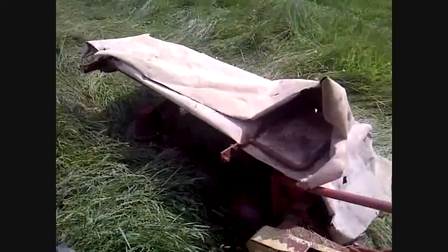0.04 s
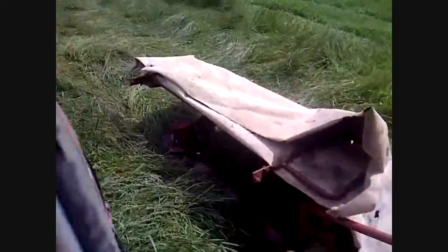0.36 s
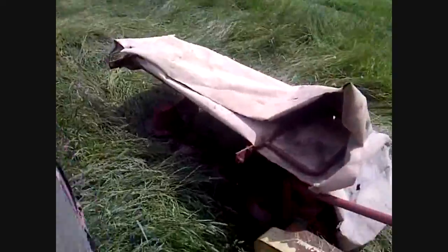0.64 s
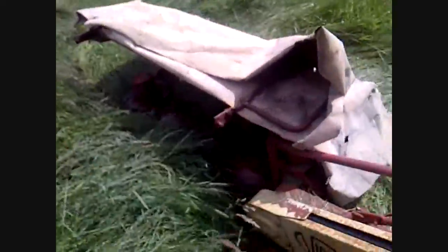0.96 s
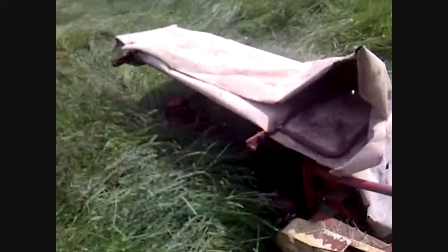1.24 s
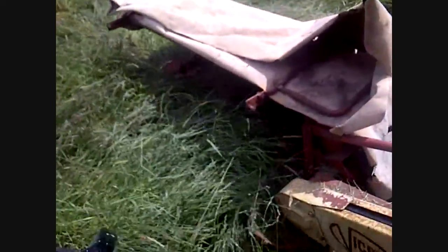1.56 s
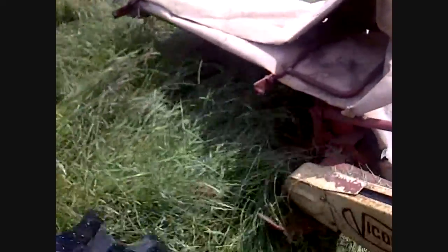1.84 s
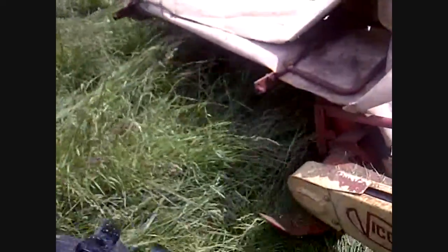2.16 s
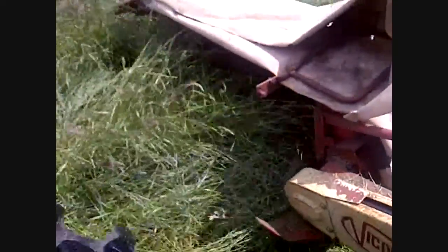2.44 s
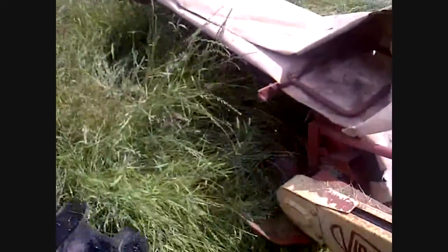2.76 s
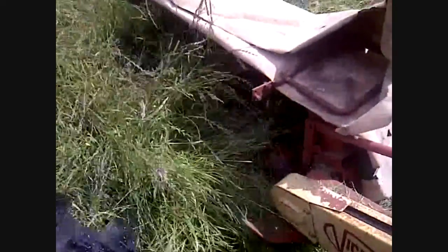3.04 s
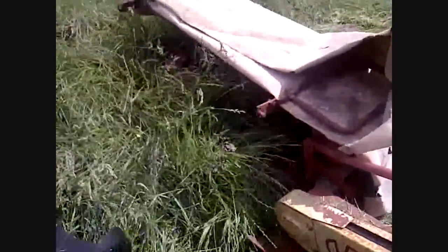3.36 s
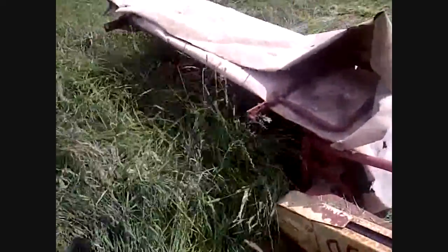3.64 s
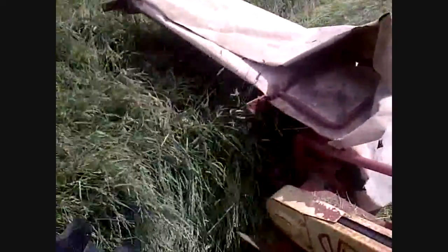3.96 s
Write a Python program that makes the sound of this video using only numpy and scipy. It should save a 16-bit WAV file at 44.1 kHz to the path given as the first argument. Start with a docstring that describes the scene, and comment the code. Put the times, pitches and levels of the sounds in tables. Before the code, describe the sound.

A disc mower roars and clatters close by for all four seconds, with hissing grass and a faint diesel hum underneath. Its gears knock most in the first 1.5 seconds; their whine swells and fades, sagging in pitch until about 2.4 seconds, then partly recovering. Blades ping near 0.4, 1.7, 2.2 and 3.9 seconds. Light wind puffs touch the microphone around 1.6 and 2.2 seconds.

```python
"""A close, clattering roar with a gear whine in it: a tractor-driven disc mower in tall grass.
Dense impacts in the cutter bar roar and ring the steel housing; the gears knock, growl and sag
under load. Stalks hiss as they snap and set the blades ringing, with a few hard pings.
The diesel hums underneath, and two puffs of wind and a faint third touch the microphone."""
import sys
import numpy as np
from scipy import signal
from scipy.fft import rfft, irfft
from scipy.io import wavfile

SR = 44100
rng = np.random.default_rng(int(sys.argv[2]) if len(sys.argv) > 2 else 0)


def store_wav(level_fs):
    """Save 16-bit WAV to argv[1]."""
    pcm = np.round(np.clip(np.atleast_2d(level_fs), -1, 1) * 32767)
    wavfile.write(sys.argv[1], SR, pcm.T.astype(np.int16))


N = 176400
T = np.arange(N) / SR

# cutter bar roar: freq_hz, density_db
ROAR_SPECTRUM = [(20, -34), (50, -35.5), (82, -23.5), (130, -21.5), (200, -18.5), (300, -10.5), (450, -3.5),
                 (530, -2.5), (595, 3), (665, -2), (785, 1.5), (840, 4.5), (940, -0.5), (1030, 1.5),
                 (1400, 2), (1650, -1.5), (2050, -14.5), (3000, -18.5), (5000, -39)]
# roar: time_s, level_db
ROAR_DB = [(0, -19.5), (.6, -19.5), (1.1, -18), (1.6, -16.5), (2.1, -15.5), (2.7, -15.5), (3.2, -17),
           (3.7, -17.5), (4, -16)]
# steel housing resonances: freq_hz, width_hz, gain_db
HOUSING_MODES = [(1009, 53, -3), (1062, 22, -2.5), (1174, 41, -1), (1246, 53, -3), (1420, 80, -2),
                 (1585, 42, -3), (1752, 60, -1.5), (1863, 66, -3)]
# housing ring: time_s, level_db
HOUSING_DB = [(0, -25.5), (.6, -24), (1, -24), (1.3, -21.5), (1.7, -23.5), (2.3, -23), (2.8, -21.5),
              (3.4, -21.5), (4, -22.5)]

# drive train speed, as the gear mesh tone: time_s, pitch_hz
MESH_HZ = [(0, 1262), (.4, 1256), (.8, 1256), (1.1, 1238), (1.5, 1218), (1.8, 1202), (2.1, 1186),
           (2.4, 1184), (2.6, 1195), (2.95, 1202), (3.2, 1218), (3.4, 1228), (3.7, 1212), (3.85, 1210),
           (4, 1222)]
# gear whine: time_s, level_db
WHINE_DB = [(0, -21.5), (.35, -23), (.6, -28), (.85, -23.5), (1.25, -19), (1.6, -25), (1.85, -19.5),
            (2.15, -28), (2.38, -17), (2.7, -27.5), (3.1, -17.5), (3.45, -17), (3.78, -29), (4, -12.5)]
# growl of worn teeth: time_s, level_db
GROWL_DB = [(0, -22), (.6, -24.5), (.85, -22), (1.3, -19), (1.7, -24), (2.3, -22), (2.8, -21.5), (3.4, -23),
            (4, -21)]
# gear knock, hardest when taking up load: time_s, level_db
KNOCK_DB = [(0, -18.5), (.5, -29.5), (.8, -21.5), (1, -19.5), (1.35, -19.5), (1.7, -29), (2.3, -29),
            (2.8, -31.5), (3.4, -28), (3.7, -31), (4, -24)]

# stalks cut and thrown against the cover: freq_hz, density_db
HISS_SPECTRUM = [(1200, -12.5), (2000, 6), (2450, 3.5), (2850, 2), (3350, 3), (3800, -1.5), (4200, -3),
                 (4480, 3), (4750, -2.5), (5100, -1), (5900, -5), (6600, -6), (7300, -10), (7900, -20)]
# stalk hiss: time_s, level_db
HISS_DB = [(0, -21.5), (.6, -20.5), (.95, -17.5), (1.5, -24.5), (2.05, -23), (2.4, -21.5), (2.75, -21.5),
           (3.3, -21.5), (3.65, -21), (3.85, -18), (4, -21)]
# top of the hiss: time_s, gain_db
HISS_TREBLE_DB = [(0, -1.5), (0.651, -7), (1, -4), (1.4, 4), (2.401, 2.5), (3.299, -2), (4, 0)]
# blade and disc resonances: freq_hz, width_hz, gain_db
BLADE_MODES = [(2490, 69, 2.5), (3293, 170, 2.5), (4010, 40, -1.5), (4130, 17, 3.5), (4440, 84, -4.5),
               (4720, 40, -10), (4930, 170, -4), (6550, 170, -13)]
# blade ring: time_s, level_db
BLADE_DB = [(0, -29.5), (.9, -32.5), (1.6, -31.5), (2.3, -27), (2.8, -27), (3.3, -37), (4, -32)]

# surges of clatter: centre_s, rattle_gain_db, clang_gain_db
SURGES = [(0.083, -28, -13), (0.148, -28, -15), (0.222, -22.5, -12), (0.313, -19, -16), (0.387, -24, -10.5),
          (0.47, -18, -9), (0.531, -18, -10.5), (0.691, -28, -10), (0.764, -17.5, -12), (0.82, -25, -9.5),
          (0.931, -19, -15), (0.973, -21, -21), (1.018, -18.5, -9.5), (1.073, -20, -9.5),
          (1.124, -35, -6.5), (1.211, -25.5, -9.5), (1.278, -25, -16), (1.359, -23, -10.5),
          (1.43, -25, -14), (1.496, -24.5, -11), (1.579, -27, -9.5), (1.658, -24.5, -8.5),
          (1.717, -20.5, -23), (1.794, -22.5, -10), (1.847, -28, -17), (1.908, -22, -11.5),
          (1.99, -19, -23), (2.049, -26, -10), (2.108, -24, -11), (2.163, -22, -13.5), (2.274, -19.5, -15),
          (2.336, -26, -8), (2.684, -23.5, -25), (2.725, -21.5, -10), (2.888, -24, -15.5), (3.023, -28, -9),
          (3.127, -20.5, -23), (3.191, -19.5, -13), (3.25, -33, -18), (3.32, -19.5, -18), (3.417, -20, -10),
          (3.472, -22, -11), (3.531, -21.5, -10.5), (3.693, -26, -12), (3.836, -24, -9), (3.898, -26, -14),
          (3.945, -31, -22)]
# metal rattle: freq_hz, density_db
RATTLE_SPECTRUM = [(1200, -9), (2000, 2.5), (2450, 4.5), (2900, 1.5), (3300, -0.5), (3900, -6), (4500, -4),
                   (5100, -1.5), (5900, -1), (6600, 1.5), (7300, -10), (7900, -20.5)]
# top of the rattle: time_s, gain_db
RATTLE_TREBLE_DB = [(0, 0), (.6, -6), (1, 0.5), (1.4, 10), (1.9, -2), (2.701, 4), (3.3, -11), (4, 3)]
# hard objects hitting a blade: start_s, pitch_hz, level_db
BLADE_HITS = [(0.382, 4759, -12.5), (1.676, 4020, -18), (2.229, 4770, -22), (3.893, 2600, -12),
              (3.897, 2730, -17)]

# diesel thump harmonics: crank_order, level_db
THUMP_ORDERS = [(1, -67), (2, -52.5), (3, -53), (4, -53), (5, -53)]
# exhaust boom at the fourth crank order: time_s, level_db
BOOM_DB = [(0, -60), (.45, -45), (.8, -48), (1.2, -64), (4, -71)]
# steady drive tones: crank_order, level_db
DRIVE_ORDERS = [(7.1, -53.5), (9.27, -43), (11.4, -42.5), (13.9, -42.5), (19.8, -40.5)]
# hum of the spinning discs: time_s, level_db
DISC_DB = [(0, -40), (1.5, -45), (2.4, -32.5), (2.8, -30), (3.5, -26.5), (4, -28)]

# wind on the microphone: centre_s, sigma_s, level_db
WIND_PUFFS = [(1.645, 0.029, -24), (2.228, .024, -27.5), (2.39, 0.021, -36)]
# wind rumble: freq_hz, density_db
WIND_SPECTRUM = [(20, -22), (70, -17), (115, -3), (220, 1), (320, -2), (600, -8.5), (2000, -74)]

TEETH, MESH_PER_CRANK_TURN, DISC_ORDER = 34, 39.55, 22.83


def cutter_bar(shaft_rad):
    """Dense impacts of discs and gears throb with the shaft, roar and ring the housing."""
    shaft_beat = np.cos(shaft_rad)
    blade_beat = np.cos(3 * shaft_rad)
    throb = 1 + .11 * shaft_beat + .13 * blade_beat + .08 * wander(rate_hz=20)
    roar = colour(throb * ticks(per_s=7000, spread_db=1.5), ROAR_SPECTRUM)
    housing = ring(ticks(per_s=3000, spread_db=.5), HOUSING_MODES)
    housing = unit(housing * (1 + .083 * shaft_beat + .13 * blade_beat))
    return envelope(ROAR_DB) * roar + envelope(HOUSING_DB) * housing


def gear_whine(mesh_rad, wobble_rad=.42, third_db=-27.5):
    """Mesh tone, shaken by backlash, swelling once per shaft turn."""
    shake = 1 + .3 * wander(rate_hz=67) + .11 * np.cos(mesh_rad / TEETH)
    phase_rad = mesh_rad + wobble_rad * wander(rate_hz=30)
    tone = np.sin(phase_rad) + amp(third_db) * np.sin(3 * phase_rad)
    return envelope(WHINE_DB) * unit(shake * tone)


def gear_growl(mesh_rad, mesh_ratio=1.03, spread_hz=114):
    """Worn, uneven teeth spread a noise band just above the mesh tone."""
    centre_rad = mesh_ratio * mesh_rad
    band = wander(spread_hz) * np.cos(centre_rad) + wander(spread_hz) * np.sin(centre_rad)
    throb = 1 + .083 * np.cos(mesh_rad / TEETH)
    return envelope(GROWL_DB) * unit(band * throb)


def gear_knocks(shaft_rad, pitch_hz=1270, jitter_rad=.5, uneven_db=2, sharpness=4.5):
    """The gearbox rings briefly once per shaft turn, uneven in timing and strength."""
    turn_rad = shaft_rad + jitter_rad * wander(rate_hz=20)
    gate = np.exp(sharpness * (np.cos(turn_rad) - 1))
    tone = np.sin(2 * np.pi * pitch_hz * T + 2 * wander(rate_hz=27))
    strength = amp(uneven_db * np.tanh(wander(rate_hz=25)))
    return envelope(KNOCK_DB) * unit(gate * tone * strength)


def grass(shaft_rad):
    """Thousands of stalks a second snap in uneven clumps and ring the blades."""
    clumps = 1 + .17 * wander(rate_hz=25) + .08 * np.cos(shaft_rad)
    snaps = clumps * ticks(per_s=9000, spread_db=1.5)
    hiss = treble_shelf(colour(snaps, HISS_SPECTRUM), HISS_TREBLE_DB)
    blades = ring(clumps * ticks(per_s=810, spread_db=1), BLADE_MODES)
    return envelope(HISS_DB) * hiss + envelope(BLADE_DB) * blades


def clatter(sigma_s=.0043, rattle_trim_db=3, clang_trim_db=-1.5):
    """Each surge is a flurry of metal ticks with a clang of the housing."""
    flurry = ticks(per_s=8000, spread_db=2.5)
    rattle = unit(colour(flurry, RATTLE_SPECTRUM) + .23 * ring(flurry, BLADE_MODES))
    rattle = treble_shelf(rattle, RATTLE_TREBLE_DB)
    housing = ring(rng.standard_normal(N), HOUSING_MODES)
    clang = unit(housing + .82 * colour(rng.standard_normal(N), ROAR_SPECTRUM))
    rattle_gate = swells([(at_s, sigma_s, db + rattle_trim_db) for at_s, db, _ in SURGES])
    clang_gate = swells([(at_s, sigma_s, db + clang_trim_db) for at_s, _, db in SURGES])
    return rattle * rattle_gate + clang * clang_gate


def blade_pings(rise_s=.0027, t60_s=.075):
    """Each hard hit rings one blade mode, which dies quickly."""
    pings = np.zeros(N)
    for start_s, pitch_hz, level_db in BLADE_HITS:
        age_s = np.maximum(T - start_s, 0)
        level = np.minimum(age_s / rise_s, 1) * amp(level_db - 60 * age_s / t60_s)
        pings += level * np.sin(2 * np.pi * pitch_hz * age_s)
    return pings


def diesel(crank_rad):
    """One low thump per crank turn, plus exhaust boom."""
    thump = sum(amp(db) * unit(np.cos(order * crank_rad)) for order, db in THUMP_ORDERS)
    return thump + envelope(BOOM_DB) * unit(np.cos(4 * crank_rad))


def drive_hum(crank_rad, wobble_rad=.58):
    """Drive and discs hum in wavering tones at multiples of the crank speed."""
    def tone(order):
        phase_rad = order * crank_rad + wobble_rad * wander(rate_hz=20) + 2 * np.pi * rng.random()
        return unit((1 + .26 * wander(rate_hz=15)) * np.sin(phase_rad))
    drive = sum(amp(db) * tone(order) for order, db in DRIVE_ORDERS)
    return drive + envelope(DISC_DB) * tone(DISC_ORDER)


def wind():
    """Brief low buffets on the microphone."""
    return swells(WIND_PUFFS) * colour(rng.standard_normal(N), WIND_SPECTRUM)


def amp(db):
    return 10 ** (np.asarray(db) / 20)


def unit(x):
    """Scales to rms 1."""
    return x / np.sqrt(np.mean(x ** 2) + 1e-20)


def curve(points):
    """Straight lines through (time_s, value) points."""
    return np.interp(T, *np.transpose(points))


def envelope(points):
    """Amplitude along (time_s, level_db) points."""
    return amp(curve(points))


def wander(rate_hz):
    """Smooth random drift, rolling off above rate_hz; rms 1."""
    f_hz = np.fft.rfftfreq(N, 1 / SR)
    low_cut = f_hz / (f_hz + 2)
    rolloff = (1 + (f_hz / rate_hz) ** 2) * np.sqrt(1 + (f_hz / rate_hz / 2) ** 2)
    return unit(irfft(rfft(rng.standard_normal(N)) * low_cut / rolloff, N))


def ticks(per_s, spread_db):
    """Random tiny impacts, a few stronger than the rest."""
    size = amp(spread_db * np.minimum(rng.exponential(1, N), 4))
    return size * np.sign(rng.standard_normal(N)) * (rng.random(N) < per_s / SR)


def swells(rows):
    """Sum of Gaussian swells."""
    return sum(amp(level_db) * np.exp(-.5 * np.minimum(((T - centre_s) / sigma_s) ** 2, 100))
               for centre_s, sigma_s, level_db in rows)


def colour(x, spectrum):
    """Shapes x by (freq_hz, density_db) points; rms 1."""
    hz, db = np.transpose(spectrum)
    f_hz = np.fft.rfftfreq(N, 1 / SR)
    gain = amp(np.interp(np.log(f_hz + 1), np.log(hz), db))
    return unit(irfft(rfft(x) * gain, N))


def ring(x, modes):
    """Passes x through steel resonances; rms 1."""
    f_hz = np.fft.rfftfreq(N, 1 / SR)
    power = sum(amp(db) ** 2 / (1 + ((f_hz - hz) / (.52 * width_hz)) ** 2) ** 2
                for hz, width_hz, db in modes)
    return unit(irfft(rfft(x) * np.sqrt(power), N))


def treble_shelf(x, points, corner_hz=4340):
    """Moves the treble along (time_s, gain_db) points."""
    top = signal.sosfiltfilt(signal.butter(2, corner_hz, "high", fs=SR, output="sos"), x)
    return x + (envelope(points) - 1) * top


def scene():
    """Mower, engine and wind in mono; all rotation follows one speed."""
    mesh_rad = 2 * np.pi * np.cumsum(curve(MESH_HZ)) / SR
    shaft_rad = mesh_rad / TEETH
    crank_rad = mesh_rad / MESH_PER_CRANK_TURN
    gears = gear_whine(mesh_rad) + gear_growl(mesh_rad) + gear_knocks(shaft_rad)
    cutting = cutter_bar(shaft_rad) + grass(shaft_rad) + clatter() + blade_pings()
    return (cutting + gears + diesel(crank_rad) + drive_hum(crank_rad) + wind())[None]


def record(dry):
    """Soft peak limit, then a steep low-pass."""
    ceiling, cutoff_hz = .95, 7980
    limited = dry / (1 + (abs(dry) / ceiling) ** 6) ** (1 / 6)
    low_pass = signal.firwin(601, cutoff_hz, window=("kaiser", 9), fs=SR)
    return signal.oaconvolve(limited, low_pass[None], "same")


dry = scene()
out = record(dry)
store_wav(out)
```